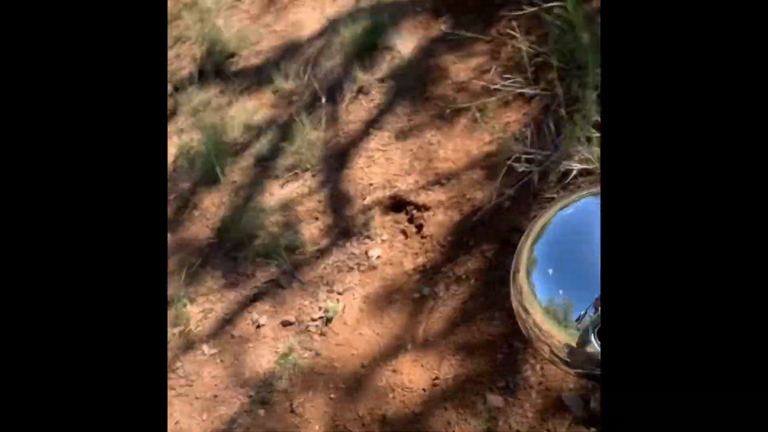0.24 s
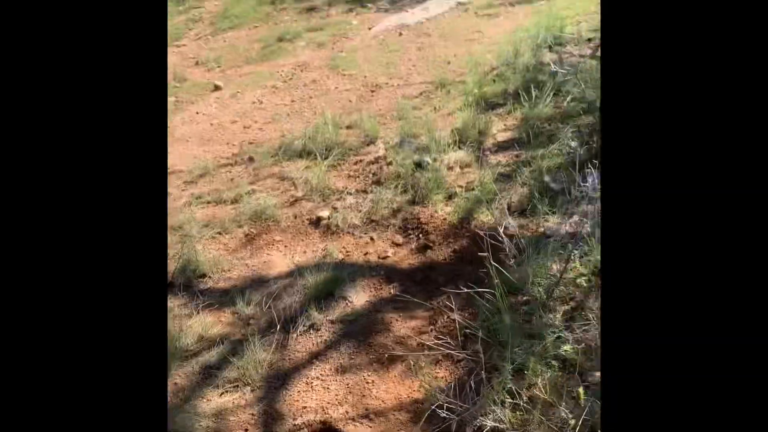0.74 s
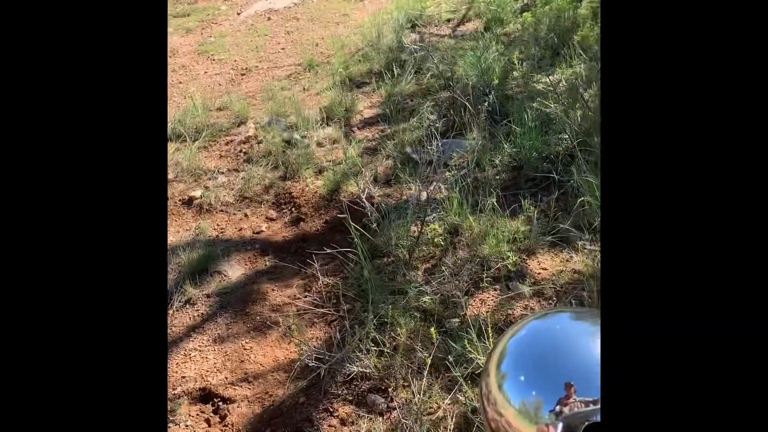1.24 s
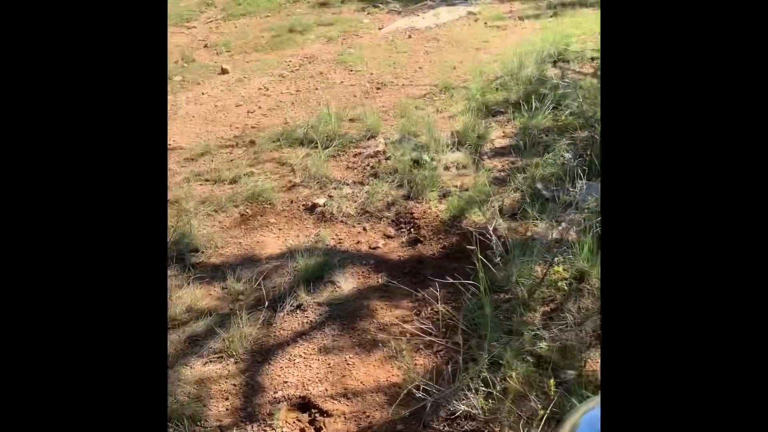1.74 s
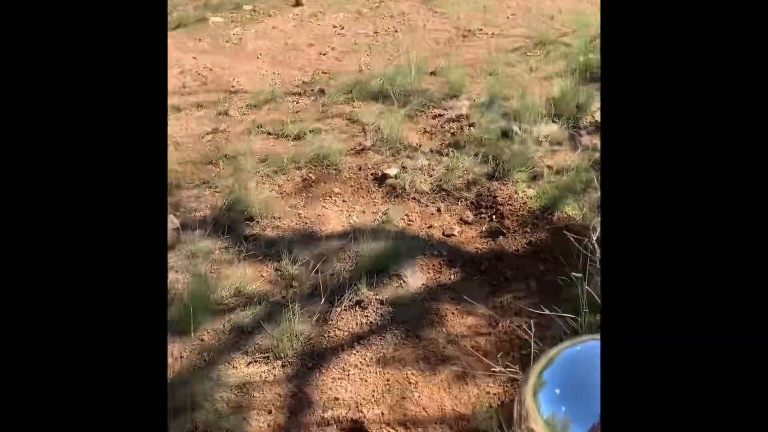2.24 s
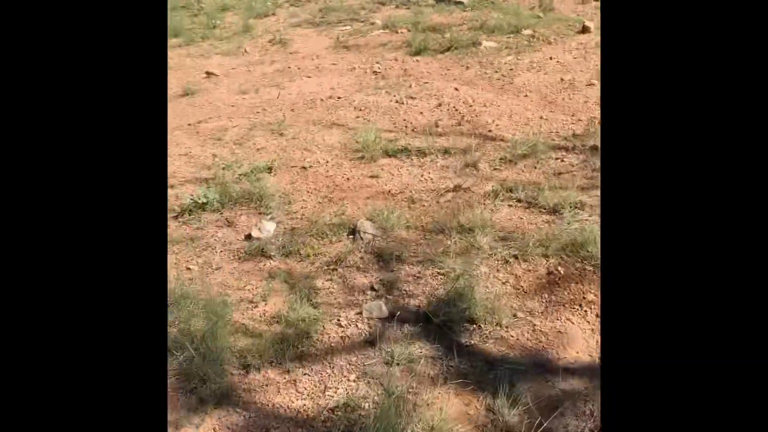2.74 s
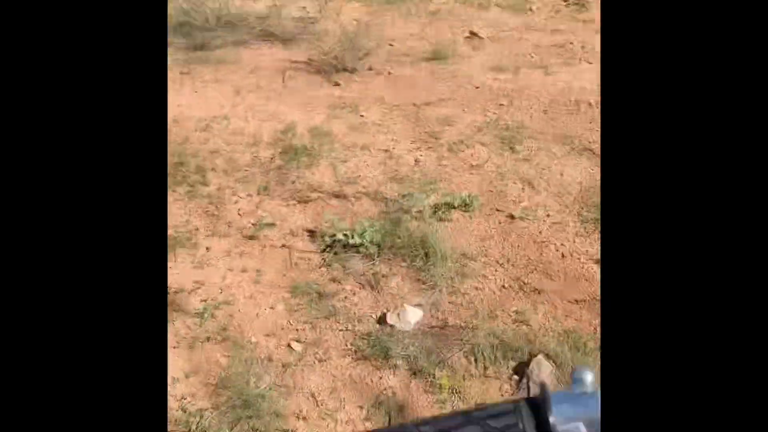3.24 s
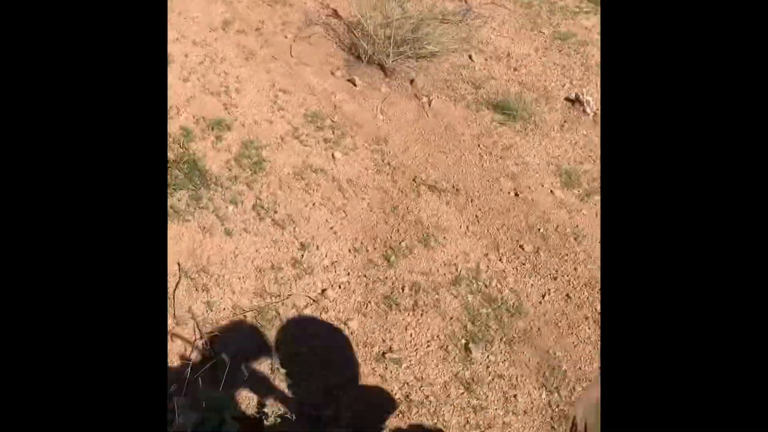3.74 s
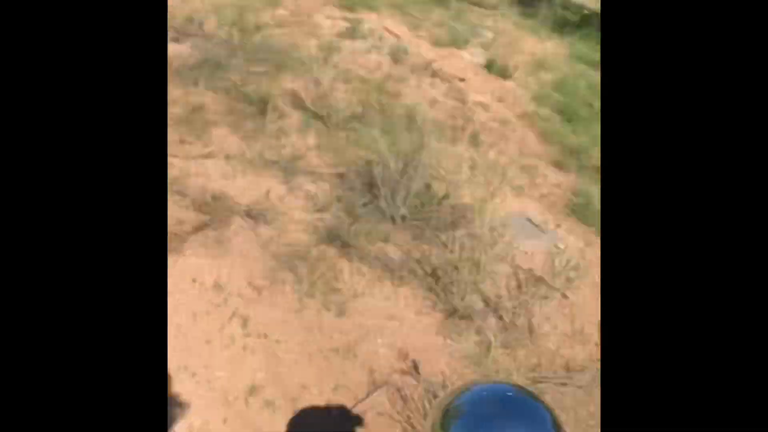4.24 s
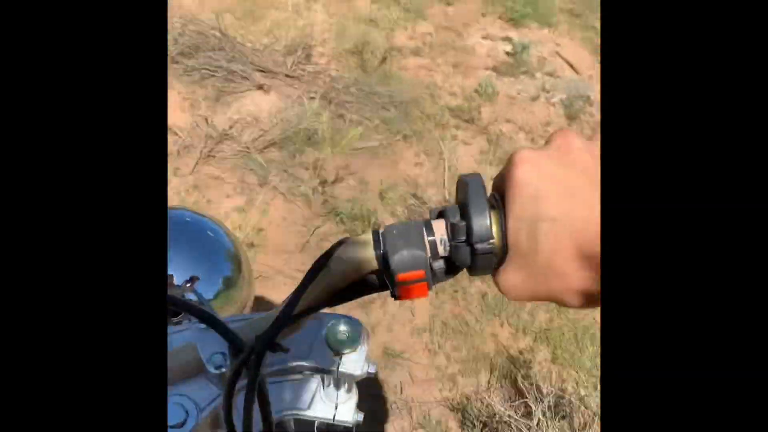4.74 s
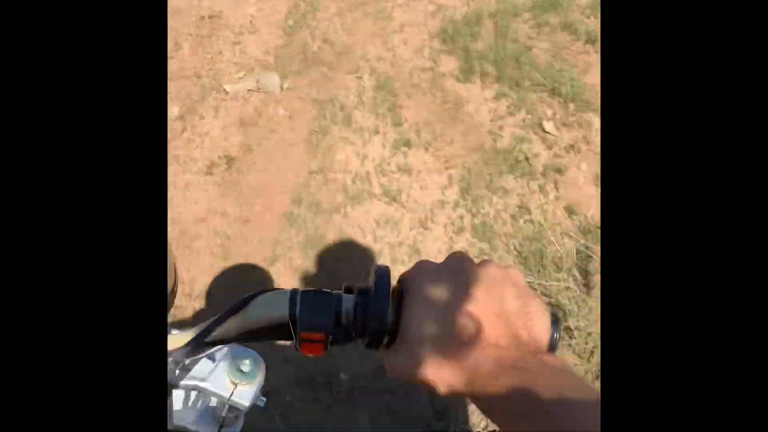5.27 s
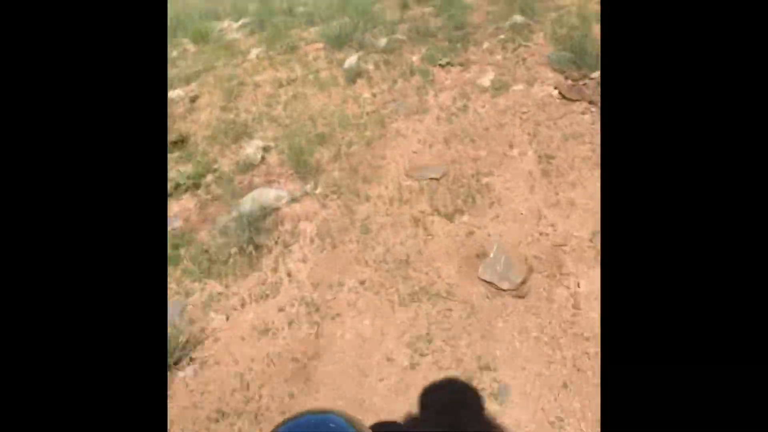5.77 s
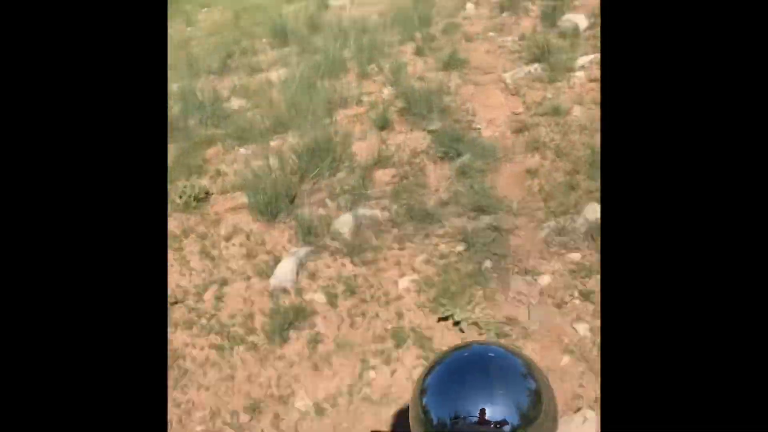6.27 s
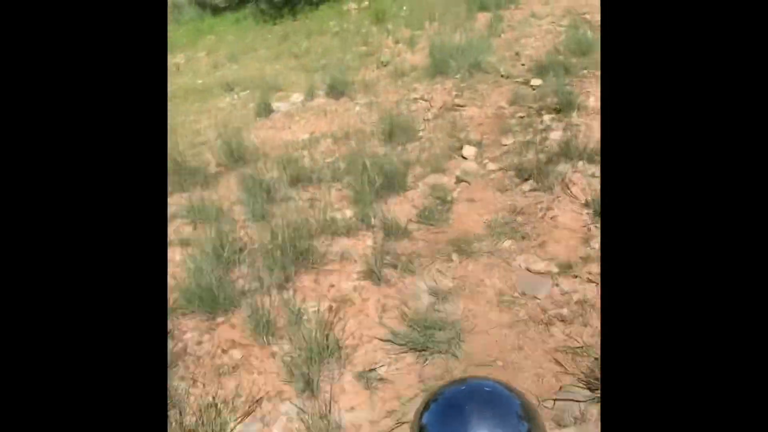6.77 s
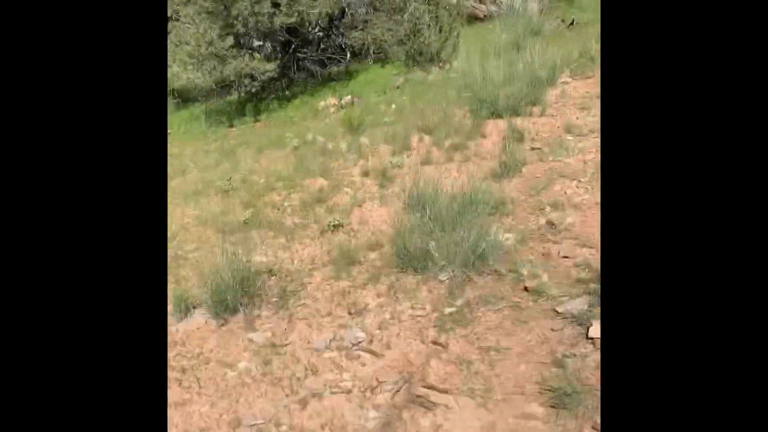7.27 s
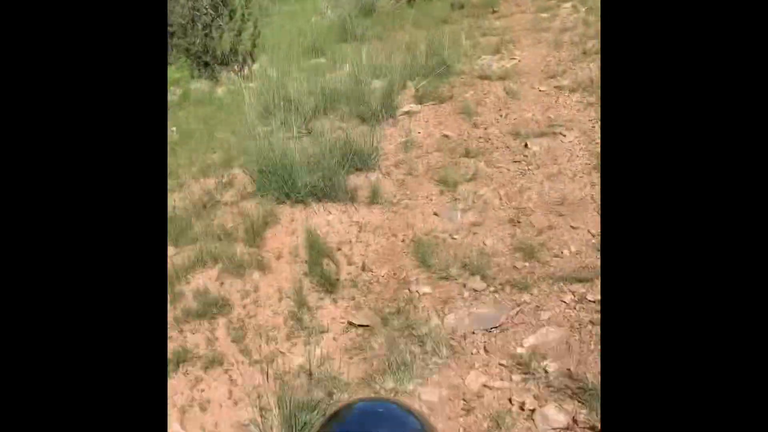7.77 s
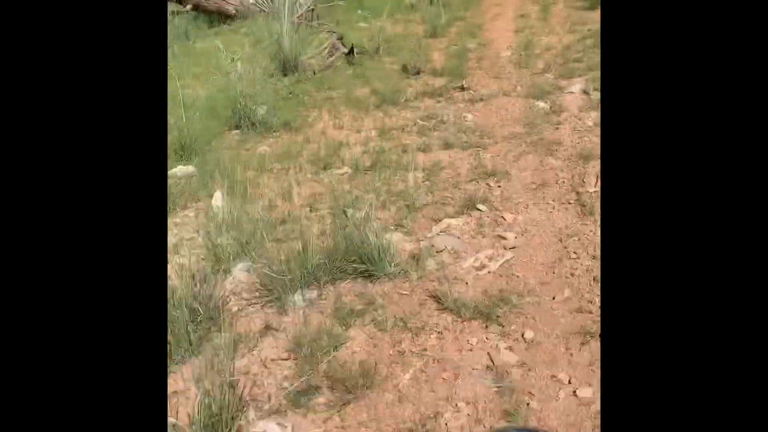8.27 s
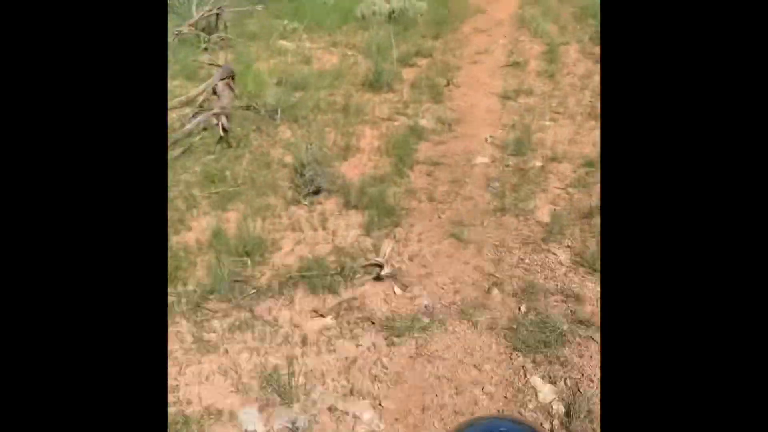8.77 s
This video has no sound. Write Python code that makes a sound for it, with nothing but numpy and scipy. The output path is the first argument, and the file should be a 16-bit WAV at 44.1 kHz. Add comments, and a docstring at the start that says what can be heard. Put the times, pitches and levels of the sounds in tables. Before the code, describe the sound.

Close-up mini bike engine putters at idle, clanks once, picks up under throttle, sags and pulls again, then runs faster over bumpy dirt outdoors.

```python
"""A small single-cylinder four-stroke engine, heard close up from the handlebar: it idles, pulls and coasts on dirt.
Each firing thumps through the muffler as a sum of harmonics and blows a burst of hot gas, shaped from noise.
Casing, panels and hiss are noise swelling with the crank; the header pipe rings and the chain rasps.
Loose parts tick, hard firings pop, one steel part clanks at idle, and stones thud through the frame.
Two microphone ports a few centimetres apart hear the engine from one side."""
import sys
import numpy as np
from scipy import signal
from scipy.fft import rfft, irfft, next_fast_len
from scipy.io import wavfile
from scipy.ndimage import uniform_filter1d, map_coordinates

SR = 44100
rng = np.random.default_rng(int(sys.argv[2]) if len(sys.argv) > 2 else 0)


def wav_record(signal):
    """Record a signal, one row per channel, as 16-bit PCM in the file named by sys.argv[1]."""
    frames = np.transpose(np.atleast_2d(signal))
    bounded = np.clip(frames, -1, 1)
    # unit amplitude maps onto the largest positive 16-bit level
    quanta = np.round(bounded * 32767).astype(np.int16)
    wavfile.write(sys.argv[1], SR, quanta)


def rack_gain(trim_db):
    """Turn a fader trim in dB into the linear factor to multiply a signal by."""
    fader = np.asarray(trim_db, float)
    return 10 ** (fader / 20)


N = 397281  # samples, about 9 s

# engine speed: start_s, firing_rate_hz
ENGINE_SPEED = [(0.0, 16.13), (1.67, 15.67), (1.72, 18.54), (1.85, 20.58), (2.48, 20.4), (3.38, 19),
                (3.48, 16.2), (3.73, 14.4), (3.92, 18.6), (3.97, 20), (4.1, 19.32), (5.17, 18.72),
                (5.8, 18.75), (5.86, 20.98), (6.89, 22), (7.13, 23.34), (7.33, 20.33), (7.49, 22.54),
                (8.05, 23.97), (8.1, 23.29), (9.01, 23.77)]
START_CYCLE = .32  # where in its cycle the engine is at the start
# engine loudness and load; the level also dips for a moment after the clank: start_s, level_db, load (0-1)
LOUDNESS_AND_LOAD = [(0, -24, 0.2), (.7, -20.5, 0), (1.0, -21, 0.05), (1.28, -21.5, 0.03),
                     (1.37, -19.5, 0.1), (1.45, -26, 0), (1.63, -20.5, 0), (1.73, -17.5, 0.86),
                     (2.4, -19, 0.72), (3.36, -21, 0.86), (3.46, -23, 0.33), (3.75, -27.5, 0.3),
                     (3.84, -25.5, 0.82), (3.92, -20.5, 1), (4.98, -19.5, 0.6), (5.06, -21.5, 0.6),
                     (5.2, -21.5, 0.8), (5.3, -21.5, 0.54), (5.45, -21, 0.34), (5.52, -22.5, 0.36),
                     (5.65, -26.5, 0.08), (5.95, -21.5, 0.33), (7.02, -20.5, 0.18), (7.38, -23, 0.03),
                     (7.5, -23, 0), (7.68, -20, 0.2), (8.1, -20.5, 0.08), (8.6, -18, 0.19),
                     (9.01, -21, 0.16)]
# share of the low sound that repeats from cycle to cycle; coasting, bumps and speed lower it: start_s, share (0-1)
STEADY_SHARE = [(0, .88), (2.6, .93), (3.38, .83), (3.5, .5), (3.82, .5), (3.92, .8), (5.5, .75),
                (5.65, .4), (5.9, .6), (7.05, .6), (7.15, .4), (7.45, .4), (7.6, .6), (9.01, .55)]

# each layer's level: over_engine_db, swing_db per dB of level, full_load_db, speed_db per extra firing a second
NOTE_LAW = (-7.5, 1.14, 2, -0.15)
CASING_LAW = (-3.5, 1.25, 0.5, 0.02)
WHIRR_LAW = (-9.5, 1.7, -0.5, -0.17)
BURST_LAW = (-19, 1.8, 17, -0.9)
HISS_LAW = (-11.5, 1.27, 6, 0.02)
USUAL_DB, USUAL_SPEED_HZ = -21, 19.5  # the level and firing rate around which those laws turn

# exhaust note idling, lugging, pulling and running: order (multiple of the firing rate), level_db
IDLE_ORDERS = [(2, -26), (3, -2), (4, 2), (5, 0.5), (6, -14), (7, -1), (8, 2.5), (9, 0), (10, -18),
               (11, -11.5), (12, -6), (13, -21), (14, -16), (15, -12.5), (16, -3.5), (17, -3.5), (18, -2.5),
               (19, -0.5), (20, -25), (21, -27), (22, -2), (23, -19), (24, -8)]
LUG_ORDERS = [(1, -38), (2, -4), (3, -8.5), (4, -0.5), (5, -1.5), (6, 2), (7, -3), (8, -9), (9, -1),
              (10, -6), (11, -4), (12, -3.5), (13, -6.5), (14, -5), (15, -3), (16, -3), (17, -0.5),
              (18, -15), (19, -3), (20, -13), (21, -21), (22, -4), (23, -9.5), (24, -8)]
PULL_ORDERS = [(1, -34.5), (2, -8), (3, -2.5), (4, 0.5), (5, -1), (6, 4), (7, -4.5), (8, 2.5), (9, -5),
               (10, -7), (11, -7), (12, -18), (13, -2), (14, -6), (15, 2), (16, 2), (17, 6), (18, -1.5),
               (19, -1), (20, -1), (21, -28), (22, -32), (23, -34), (24, -30), (25, -4), (26, -4),
               (27, -26), (28, -3.5)]
RUN_ORDERS = [(1, -35), (2, 0.5), (3, -1), (4, -12), (5, 6.5), (6, 0), (7, -2), (8, 3), (9, -40), (10, -4),
              (11, -1), (12, 6), (13, -20), (14, -25), (15, 5.5), (16, -4.5), (17, -30), (18, -1), (19, -1),
              (20, 1), (21, -8), (22, 1), (23, -7), (24, -7.5)]
# engine speed of each of those four notes: firing_rate_hz
NOTE_SPEEDS = [16.5, 19, 20.3, 22.5]
# how each note's wave leaves the exhaust: lag_cycles, late_cycles, start_rad, top swept order,
# smear_rad per order above the sixth
STROKES = [(1, .305, -2.4, 12, .06), (1.7, -.3, -1.8, 8, .12), (1.7, -.3, -2, 8, .08),
           (2.05, -.44, -2.4, 6, .3)]
PIPE_ECHO_CYCLES, PIPE_DIRECT = .27, .75  # the header pipe returns part of each stroke this much later
# muffler resonances: pitch_hz, width_hz, level_db
MUFFLER = [(44, 22, -14), (86.5, 26, -1), (116.6, 23.4, -2), (168.5, 21, -6.5)]

# engine casing resonances: pitch_hz, width_hz, level_db
CASING = [(172.6, 54, -5), (253.4, 63, -6.5), (320.1, 36.2, 1), (353, 93, -3.5), (529.8, 38, -4),
          (603.6, 39.5, -3.5), (653, 188, -8.5)]
# panels that ring when slow: pitch_hz, width_hz, level_db
PANELS = [(890, 160, 2.5), (1233, 355, 3), (1390, 173, 4.5), (1703, 146, 0.5), (1916, 100, 0),
          (2203, 250, -2.5), (2896, 98, -5), (3200, 550, -13.5), (3880, 53, -15)]
# guards that ring at speed: pitch_hz, width_hz, level_db
GUARDS = [(828, 130, 0), (1182, 114, 3), (1390, 107, 2), (1634, 194, -2), (1980, 240, 0), (2370, 410, -3.5),
          (2740, 510, -5), (3340, 180, -5.5), (3790, 250, -9)]

# colour of the gas burst: pitch_hz, level_db per Hz
BURST_COLOUR = [(250, -47), (500, 14), (1200, -4.5), (2800, -10), (4700, -4), (5800, -1.5), (6400, -7),
                (7000, 3), (8500, 3.5), (9600, 0.5), (11000, -3.5), (16000, -5)]
# brief whistle of each blow in the outlet: pitch_hz, width_hz, level_db
TAILPIPE = [(6320, 350, 4.5), (7650, 260, -10.5)]
# strength of that whistle: start_s, level_db over the blow
WHISTLE_LEVEL = [(1.6, -21), (1.8, -6), (2.3, -9), (2.8, -3), (3.4, -5.5), (3.9, -9.5), (5.3, -7.5),
                 (5.8, -5), (7, -8)]
# rough notes within each blow: start_s, middle pitch_hz, spread_octaves, level_db over the blow
BARK = [(0, 2240, 0.34, -13), (1.7, 2387, 0.47, -6.5), (3.4, 2491, 0.41, -7.5), (3.9, 2806, 0.47, -9),
        (5.4, 2900, 0.46, -4.5), (5.9, 2097, .25, -2), (7.1, 2107, 0.34, -4), (9.01, 2106, 0.43, -2.5)]
# colour of the steady hiss: pitch_hz, level_db per Hz
HISS_COLOUR = [(1500, -16), (3000, -3), (4800, -3.5), (6300, -2.5), (9000, -0.5), (11000, -1.5),
               (13500, -2.5), (14500, -2), (16000, 1.5)]
# the steady hiss swells and fades, strongest near 3.4 s and 5.2 s: start_s, added level_db
HISS_SWELL = [(1.6, 1), (1.75, 0), (2.5, 0), (3.0, 2), (3.42, 5), (3.47, 2), (3.86, -5), (3.91, 1.5),
              (4.5, 4), (5.2, 6), (5.32, 2), (5.9, 0.5), (7, 0), (9.01, 0)]

# header pipe, ringing on from one firing to the next: pitch_hz, width_hz, level_db
HEADER = [(306, 15.5, -4), (340, 16.5, 1), (519.6, 24, -2.5)]
# strength of the header ring: start_s, level_db
HEADER_LEVEL = [(1.66, -40), (1.75, -30), (2.6, -31), (3.4, -34), (3.5, -53), (3.88, -43), (4.0, -44),
                (5.3, -29), (5.6, -47), (6.0, -35), (9.01, -40)]
# ticks of loose parts: start_s, nominal peak level_db
TICKS = [(0.283, -37), (0.347, -31.5), (0.595, -36), (0.661, -31), (0.724, -37), (0.789, -28), (0.853, -31),
         (0.976, -34), (1.04, -29), (1.104, -29.5), (1.17, -43), (1.224, -30.5), (1.29, -30),
         (1.482, -32.5), (1.605, -30), (7.241, -34), (7.2967, -30.5), (7.4394, -51), (8.01, -28.5),
         (8.1638, -34), (8.2057, -29.5)]
# colour of a tick: pitch_hz, level_db per Hz
TICK_COLOUR = [(1500, -25), (3000, -6), (6300, -6), (8000, -3.5), (10500, -0.5), (12500, -6), (16000, -4)]
# hard firings at low speed that make the casing pop: start_s, nominal peak level_db
POPS = [(0.666, -15), (0.792, -13), (0.856, -8.5), (0.98, -17), (1.046, -12), (1.109, -11.5), (1.23, -13),
        (1.297, -8), (3.882, -12), (3.934, -16)]
# the casing note of a pop: pitch_hz, width_hz, level_db
POP_NOTE = [(303, 52, 4)]
# the clank: start_s, nominal peak level_db
CLANK = [(1.3295, 3)]
# rings of the struck steel: pitch_hz, level_db, t60_s
STEEL = [(468, 1, 0.14), (560, -6, 0.1), (764, -4, 0.15), (1350, -9, 0.08), (1653, -3, 0.13),
         (1744, -7, 0.13), (2250, -11, 0.07), (2681, -12, 0.1), (2918, -7, 0.12), (3456, -5, 0.06),
         (3900, -11, 0.05), (5300, -9, 0.03), (6120, -9, 0.06), (6550, 4, 0.022), (7400, -5, 0.025)]
# stones under the wheels: start_s, nominal peak level_db
BUMPS = [(1.678, -16), (5.001, -15), (6.909, -26), (6.946, -23.5), (7.104, -10), (7.184, -14.5),
         (7.22, -15.5), (7.269, -24), (7.311, -19), (7.403, -13), (7.485, -24.5)]
# thud of the frame: pitch_hz, width_hz, level_db
FRAME = [(78, 22, 3.5), (130, 56, 0), (190, 62, -18)]
# links on the sprockets: pitch_hz, width_hz, level_db
CHAIN = [(2900, 330, 3.5), (3430, 370, 1), (3800, 320, 4)]
# the chain rasps as the bike rolls: start_s, level_db
CHAIN_LEVEL = [(3.5, -73), (3.95, -40), (5.4, -38.5), (5.7, -45), (6.1, -46), (7.4, -43), (9.01, -46)]

# likeness of noise in the left and right channels: pitch_hz, likeness (0-1)
STEREO_LIKENESS = [(40, 0.46), (100, 0.89), (400, 0.78), (600, 0.59), (900, 0.39), (2000, 0.93),
                   (3000, 0.098), (4000, 0.69)]
BETWEEN_LIKENESS = .49  # likeness between the treble bands that are purely mid or side
# stereo phase by pitch; treble bands are purely mid or side: pitch_hz, left over right phase in half turns
STEREO_PHASE = [(0, 0), (300, -.1), (550, -.33), (690, -.45), (1030, -.38), (1500, 0), (2000, .29),
                (3000, .16), (4250, 1), (5200, 1), (6300, 2), (7250, 2), (8400, 3), (9450, 3), (10500, 4),
                (11600, 4), (12500, 5), (13700, 5), (14750, 6)]
# stereo level by pitch: pitch_hz, left over right level_db
LEFT_LOUDER = [(60, .8), (120, 1.2), (240, 2.5), (480, 3), (950, -1), (1890, -.5), (3500, -1), (4200, 0)]
TOP_HZ = 15800  # band limit of the microphone signal


def unit(x):
    """Scaled to rms 1."""
    return x / np.sqrt(np.mean(x ** 2) + 1e-20)


def along(points, hz):
    """(Hz, value) points read on a log frequency axis."""
    f, v = np.transpose(points)
    return np.interp(np.log(hz + 1), np.log(f + 1), v)


def curves(rows):
    """One value per sample for each column after the time."""
    s, *cols = np.transpose(rows)
    return [np.interp(np.arange(N) / SR, s, c) for c in cols]


def wobble(rate):
    """A smooth random curve with rate knots a second."""
    knots = rng.standard_normal(int(N * rate / SR) + 4)
    return map_coordinates(knots, [np.arange(N) * rate / SR])


def filtered(x, response):
    """x shaped by a complex response of frequency."""
    m = next_fast_len(N + SR // 2)
    return irfft(rfft(x, m) * response(np.fft.rfftfreq(m, 1 / SR)), m)[..., :N]


def coloured(x, points):
    """x shaped by a (Hz, dB) spectrum."""
    return filtered(x, lambda hz: rack_gain(along(points, hz)))


def resonant(modes):
    """Causal response of a few damped resonances, with alternating signs."""
    def response(f):
        return sum((-1) ** k * rack_gain(db) * 1j * f * w / (c * c - f * f + 1j * f * w)
                   for k, (c, w, db) in enumerate(modes))
    return response


def blend(modes, excitation):
    """An excitation through resonances, at rms 1."""
    return unit(filtered(excitation, resonant(modes)))


def noise():
    """White noise in two channels, alike in part: a shared mid and an opposed side."""
    def response(hz):
        settled = np.interp(hz, *np.transpose(STEREO_PHASE)) % 1 == 0
        treble = np.where(settled, 1, BETWEEN_LIKENESS)
        likeness = np.where(hz < 4250, along(STEREO_LIKENESS, hz), treble)
        turn = np.arccos(np.clip(likeness, 0, 1)) / 2
        return np.array([np.cos(turn), np.sin(turn)])
    mid, side = filtered(rng.standard_normal((2, N)), response)
    return np.array([mid + side, mid - side])


def patchy(x, depth_db, count=3):
    """Random gain in narrow, short patches: a colour lasts about count frames."""
    z = signal.stft(x, nperseg=512)[2]
    field = rng.standard_normal(z.shape[-2:])
    field = uniform_filter1d(field, size=1 + (count < 5), axis=0)
    field = uniform_filter1d(field, size=count, axis=1)
    return signal.istft(z * rack_gain(depth_db * unit(field)), nperseg=512)[1][..., :N]


def crank():
    """Firings so far at every sample: the running sum of engine speed."""
    return START_CYCLE + np.cumsum(curves(ENGINE_SPEED)[0]) / SR


def pulses(cycle, offset, scatter_db, jitter_s):
    """One impulse a cycle, each of its own size and a little early or late."""
    beat = np.flatnonzero(np.diff(np.floor(cycle - offset)))
    size, late = rng.standard_normal((200, 2))[:len(beat)].T
    at = np.clip(beat + np.round(late * jitter_s * SR).astype(int), 0, N - 1)
    return np.bincount(at, rack_gain(scatter_db * size), N)


def hits(rows, gain_db):
    """One impulse at each listed time, raised by gain_db."""
    s, db = np.transpose(rows)
    return np.bincount(np.round(s * SR).astype(int), rack_gain(db + gain_db), N)


def puff(train, rise_s, fall_s):
    """Each impulse drawn out to a quick swell and a slower fade."""
    t = np.arange(SR // 10) / SR
    return signal.fftconvolve(train, (1 - np.exp(-t / rise_s)) * np.exp(-t / fall_s))[:N]


def layer_db(law, level_db, load):
    """A layer's level follows engine level, load and speed."""
    over_db, swing, load_db, speed_db = law
    faster = curves(ENGINE_SPEED)[0] - USUAL_SPEED_HZ
    return USUAL_DB + over_db + swing * (level_db - USUAL_DB) + load_db * load + speed_db * faster


def note(orders, cycle, lag, late, start, top, smear):
    """One exhaust cycle, repeated: the muffler delays low order k by lag / k cycles; high orders scatter."""
    k, db = np.transpose(orders)
    low = np.minimum(k, top)
    phase = start - 2 * np.pi * (lag * np.log(low) + late * low)
    phase = phase + smear * np.maximum(k - 6, 0) * rng.standard_normal(len(k))
    # the pipe's echo turns the phase of the orders above the eighth
    echo = np.exp(-2j * np.pi * k * PIPE_ECHO_CYCLES)
    phase = phase + (k > 8) * np.angle((PIPE_DIRECT + echo) / (1 + PIPE_DIRECT * echo))
    turn = np.arange(1025) / 1024
    wave = rack_gain(db) @ np.cos(2 * np.pi * np.outer(k, turn) + phase[:, None])
    low_rms = np.sqrt(np.sum(rack_gain(db[k <= 8]) ** 2) / 2)
    return np.interp(cycle % 1, turn, wave / low_rms)


def exhaust(cycle, steady):
    """The note changes colour with speed; idling, the deep thump comes half a cycle after the firing."""
    speed = uniform_filter1d(np.gradient(cycle) * SR, size=SR // 8, mode="nearest")
    shaky = cycle + .003 * wobble(20) + .012 * (1 - steady) * wobble(8)
    tone = 0
    all_orders = IDLE_ORDERS, LUG_ORDERS, PULL_ORDERS, RUN_ORDERS
    for orders, stroke, row in zip(all_orders, STROKES, np.eye(4)):
        share = np.interp(speed, NOTE_SPEEDS, row)
        tone = tone + np.sqrt(share) * note(orders, shaky, *stroke)
    rumble = blend(MUFFLER, noise())
    return np.sqrt(steady) * tone * rack_gain(1.1 * wobble(24)) + np.sqrt(1 - steady) * rumble


def valve_clack(cycle, offset):
    """The valves clack at their own place in each cycle: a short swell of uneven size."""
    return puff(pulses(cycle, offset, scatter_db=3, jitter_s=.001), rise_s=.003, fall_s=.004)


def casing_roar(cycle, load, knock):
    """Casing resonances driven by noise that swells with each firing and valve clack."""
    beat = 1 - .12 * load + .55 * knock + .73 * load * valve_clack(cycle, .1)
    return blend(CASING, patchy(noise() * rack_gain(.88 * wobble(40)) * beat, depth_db=2.5))


def panel_whirr(cycle, load, knock, fast):
    """Panels when slow, guards at speed, rung by noise that beats with the crank."""
    beat = 1 - .21 * load + 4.2 * load * knock + .22 * knock + 1.6 * valve_clack(cycle, -.356)
    uneven = rack_gain(.7 * wobble(150) + 1.16 * (1 - load) * wobble(10))
    rattle = patchy(noise() * uneven * beat, depth_db=3.5, count=10)
    whirr = np.sqrt(1 - fast) * blend(PANELS, rattle) + np.sqrt(fast) * blend(GUARDS, rattle)
    # at the start the idling frame buzzes near its lowest panel note
    fade = np.interp(np.arange(N) / SR, [.5, .85], [1.2, 0])
    return whirr + blend(PANELS[:1], noise() * rack_gain(3 * wobble(25))) * fade


def bark(cycle, swell):
    """Six short rough notes a firing, drawn anew each time around the middle pitch."""
    middle_hz, octaves, db = curves(BARK)
    draws = rng.standard_normal((200, 2, 6))
    pitch, size = draws[np.floor(cycle - .35).astype(int)].transpose(1, 2, 0)
    hz = middle_hz * 2 ** (octaves * np.clip(pitch, -1.8, 1.8) + .04 * wobble(300))
    tones = rack_gain(2.2 * size) * np.sin(2 * np.pi * np.cumsum(hz, axis=1) / SR)
    return rack_gain(db) * unit(tones.sum(axis=0) * swell)


def gas_burst(cycle, load, fast):
    """Hot gas leaves in turbulent blows, each with an outlet whistle and a bark."""
    # the blows are less even at low load
    blows = pulses(cycle, -.155, scatter_db=.9, jitter_s=.001) * rack_gain(3 * (1 - load) * wobble(16))
    swell = puff(puff(blows, rise_s=.002, fall_s=.0016), rise_s=.003, fall_s=.0036)
    # the valve cracks open a moment before the blow; at speed the gas trails on after it
    trail = .004 * fast * puff(swell, rise_s=.002, fall_s=.012)
    swell = swell * (1 - .3 * fast) + 8 * load * valve_clack(cycle, -.27) + trail
    blow = unit(coloured(patchy(noise() * swell, depth_db=5), BURST_COLOUR))
    whistle = rack_gain(curves(WHISTLE_LEVEL)[0]) * blend(TAILPIPE, noise() * swell)
    return blow + whistle + bark(cycle, swell)


def steady_hiss(cycle, load, knock):
    """Broad noise that lasts through the cycle, stirred by loaded firings and light-load clacks."""
    beat = 1 + .78 * load * knock + 1.1 * (1 - load) * valve_clack(cycle, .17)
    uneven = rack_gain(1.5 * wobble(14) + .7 * wobble(8))
    return unit(coloured(patchy(noise() * uneven * beat, depth_db=3.6, count=8), HISS_COLOUR))


def engine():
    """Exhaust note, casing, panels, gas and hiss, all beating with the crank."""
    (level_db, load), (steady,), cycle = curves(LOUDNESS_AND_LOAD), curves(STEADY_SHARE), crank()
    load = np.clip(load, 0, 1)
    fast = np.interp(curves(ENGINE_SPEED)[0], [20.6, 21.4], [0, 1])  # firings a second
    # every firing shakes the metal harder for a moment
    knock = puff(pulses(cycle, -.17, scatter_db=1.5, jitter_s=.001), rise_s=.004, fall_s=.0055)

    def gain(law, extra_db=0):
        return rack_gain(layer_db(law, level_db, load) + extra_db)
    mix = gain(NOTE_LAW) * exhaust(cycle, steady)
    mix = mix + gain(CASING_LAW) * casing_roar(cycle, load, knock)
    mix = mix + gain(WHIRR_LAW) * panel_whirr(cycle, load, knock, fast)
    mix = mix + gain(BURST_LAW) * gas_burst(cycle, load, fast)
    return mix + gain(HISS_LAW, curves(HISS_SWELL)[0]) * steady_hiss(cycle, load, knock)


def header():
    """Regular firings keep the pipe's narrow resonances sounding."""
    firings = pulses(crank(), -.1, scatter_db=1.5, jitter_s=.0002)
    return rack_gain(curves(HEADER_LEVEL)[0]) * blend(HEADER, firings)


def ticks():
    """Loose parts rattle in short bright puffs of noise."""
    return coloured(noise() * puff(hits(TICKS, 16.5), rise_s=.002, fall_s=.009), TICK_COLOUR)


def pops():
    """Each hard firing rings one casing note briefly."""
    return filtered(puff(hits(POPS, 22), rise_s=.00083, fall_s=.00083), resonant(POP_NOTE))


def clank():
    """A steel part struck once: a crack, a rattle of the bodywork and short rings."""
    out, t = np.zeros(N + SR), np.arange(SR // 3) / SR
    for s, db in CLANK:
        ring = sum(rack_gain(level - 60 * t / t60) * np.sin(2 * np.pi * hz * t) for hz, level, t60 in STEEL)
        crack = .9 * rack_gain(-60 * t / .05) * rng.standard_normal(len(t))
        rattle = np.pad(rack_gain(-60 * t / .12) * rng.standard_normal(len(t)), (0, N - len(t)))
        bodywork = rack_gain(-5) * filtered(rattle, resonant(CASING + PANELS))[:len(t)]
        onset = 1 - np.exp(-t / .0012)
        out[round(s * SR):][:len(t)] += rack_gain(db - 12.5) * (ring + crack + bodywork) * onset
    return out[:N]


def bumps():
    """Stones under the wheels thud dully through the frame's resonances."""
    return filtered(puff(hits(BUMPS, 15), rise_s=.0016, fall_s=.0019), resonant(FRAME))


def chain():
    """A rough, uneven rasp of links on the sprockets: flickering noise through resonances."""
    rasp = noise() * rack_gain(7.3 * wobble(90) + 2.4 * wobble(12))
    return rack_gain(curves(CHAIN_LEVEL)[0]) * blend(CHAIN, rasp)


def scene():
    """Everything that the two ports hear, before their stereo phase and level."""
    return engine() + header() + ticks() + pops() + clank() + bumps() + chain()


def top_cut(x):
    """Nothing passes above the cut-off."""
    return signal.sosfilt(signal.butter(12, 17100, fs=SR, output="sos"), x)


def record(dry):
    """Left and right differ in phase and level by pitch; no deep bass, nothing above the band limit."""
    def stereo(hz):
        # each channel takes half of the difference
        half_turns = np.interp(hz, *np.transpose(STEREO_PHASE))
        half = rack_gain(along(LEFT_LOUDER, hz) / 2) * np.exp(.5j * np.pi * half_turns)
        bass_cut = np.sqrt(1 + (45 / (hz + 1)) ** 6)
        return np.array([half, 1 / half]) / bass_cut
    wet = filtered(dry, stereo)
    # the preamplifier rounds off the tallest peaks
    wet = wet / (1 + np.abs(wet / .95) ** 6) ** (1 / 6)
    wet = filtered(wet, lambda hz: hz < TOP_HZ)
    return top_cut(wet)


dry = scene()
out = record(dry)
wav_record(out)
```